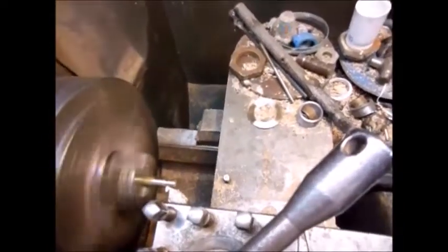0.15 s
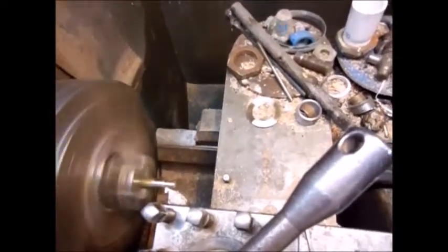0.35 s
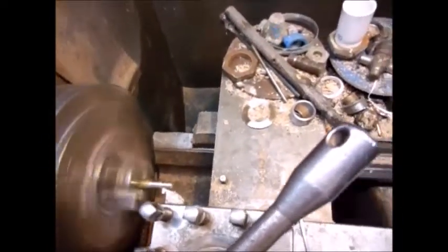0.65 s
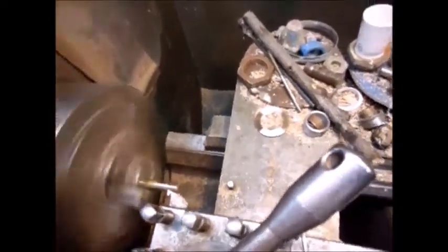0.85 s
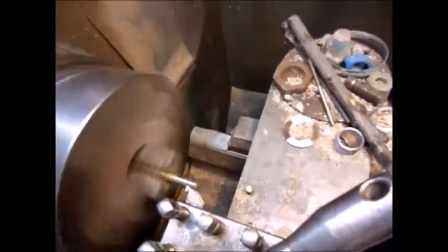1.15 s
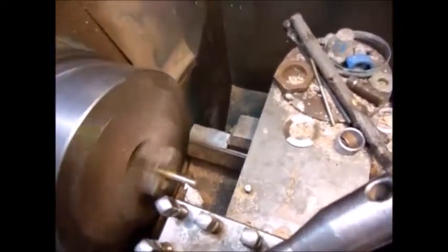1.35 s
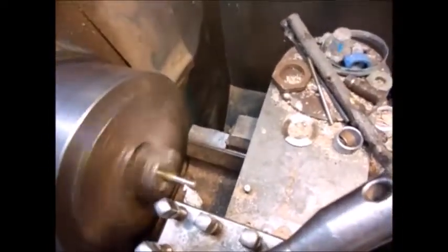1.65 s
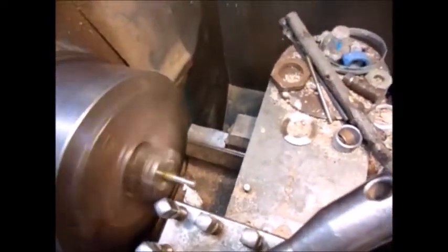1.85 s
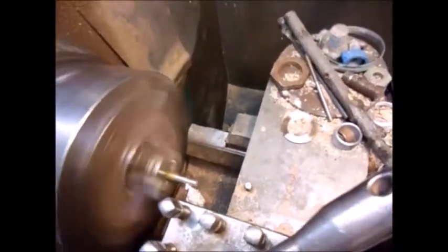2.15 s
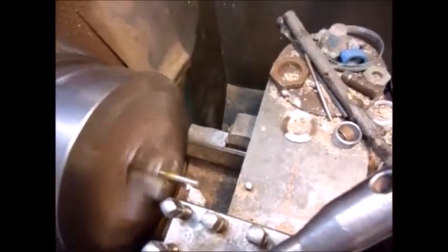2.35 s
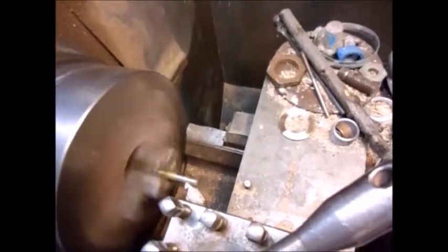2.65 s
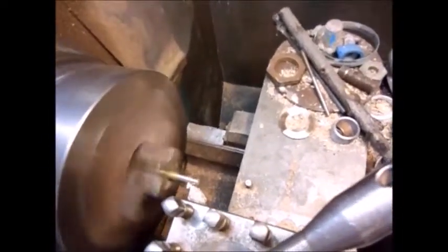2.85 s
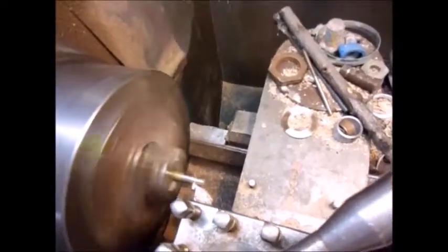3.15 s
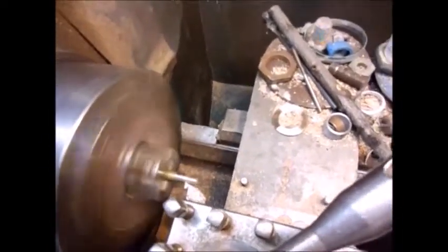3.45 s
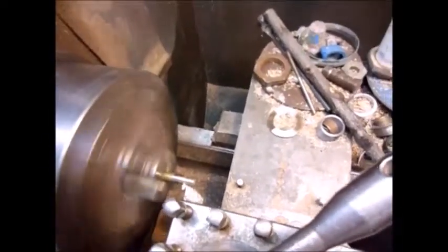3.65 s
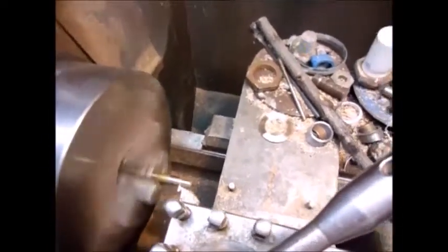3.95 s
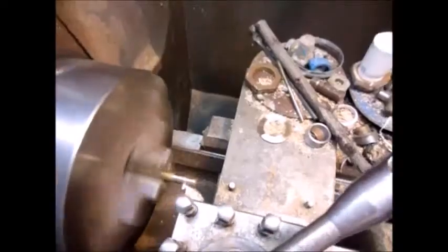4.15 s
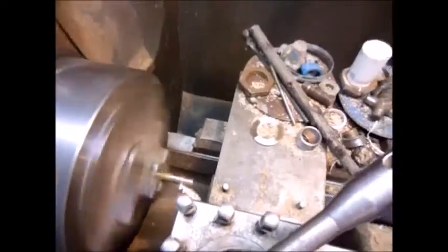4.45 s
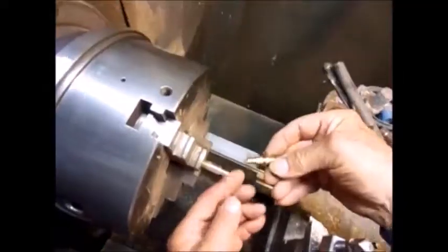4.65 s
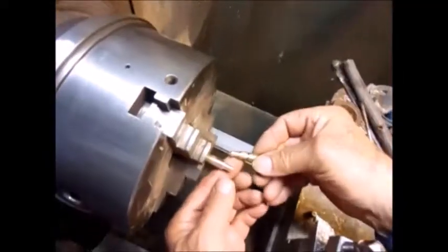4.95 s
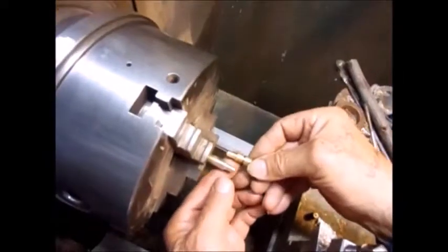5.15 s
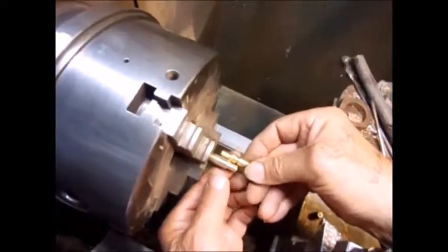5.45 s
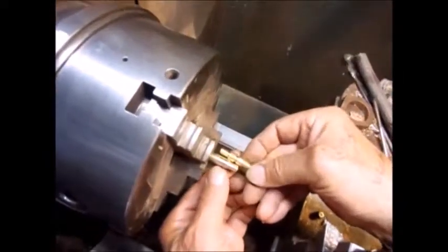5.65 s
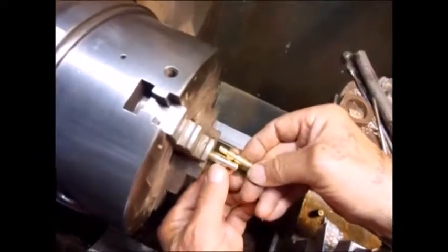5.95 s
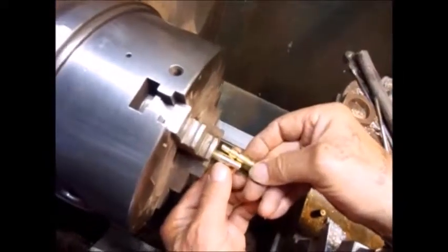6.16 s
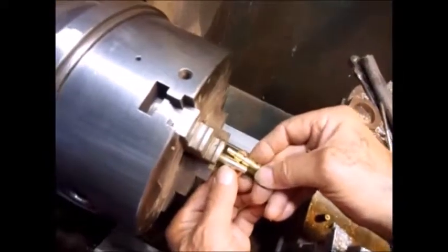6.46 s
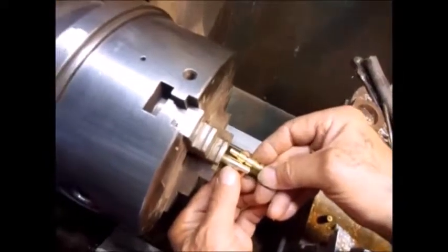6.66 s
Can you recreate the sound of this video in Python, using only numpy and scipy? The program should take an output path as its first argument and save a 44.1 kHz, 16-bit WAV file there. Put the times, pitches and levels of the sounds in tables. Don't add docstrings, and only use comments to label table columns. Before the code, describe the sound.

From 0 to 4.6 seconds a metal lathe runs loudly at close range in a small workshop. A steady mid-pitched gear whine flutters quickly and sways slowly over a rough, ringing cast-iron rumble that throbs about six times a second. Dry chip scuffs scatter through it, clearest near 0.8 and 3.75. The tool barely hisses at first, firming around 2 seconds. Short, bright bites squeak at 3.1 and 3.25, then longer stuttering squeals run from 3.35 to 3.6. The whine thins, and from 4.4 a coarse buzz grows as the cut deepens. At 4.6 it all stops dead. Far quieter room air settles, with tiny finger scratches and a knock until 4.75. A faint distant machine hum swells from 5.1 to 6. Sparse, delicate ticks follow at 5.5 and 5.7, then a faint ring at 6.5 and small knocks until 6.8.

```python
import sys
import numpy as np
from scipy import signal
from scipy.io import wavfile

SR = 44100
rng = np.random.default_rng(int(sys.argv[2]) if len(sys.argv) > 2 else 0)


def invert_db(x):
    u = np.asarray(x, float) / 20
    return 10 ** u


def dump(signal):
    limited = np.clip(np.atleast_2d(signal).T, -1, 1)
    pcm = np.round(limited * 32767).astype(np.int16)
    wavfile.write(sys.argv[1], SR, pcm)


N = 300762
T = np.arange(N) / SR
STOP_S = 4.6108
RUNNING_PART = slice(0, round(STOP_S * SR + 9))
QUIET_PART = slice(round(STOP_S * SR - SR / 10), N)


def rms_one(x):
    return x / np.sqrt(np.mean(x ** 2) + 1e-20)


def at_hz(points, hz):
    table_hz, value = np.transpose(points)
    return np.interp(np.log(hz), np.log(table_hz), value)


def drift(rate):
    r = np.exp(-80 * np.pi * rate / SR)
    white = rng.standard_normal(N // 40 + 2002)
    slow = signal.lfilter([1], [1, -2 * r, r * r], white)[2000:]
    return np.interp(np.arange(N) / 40, np.arange(len(slow)), rms_one(slow))


def resonance(x, hz, width):
    r = np.exp(-np.pi * width / SR)
    rung = signal.lfilter([1, 0, -1], [1, -2 * r * np.cos(2 * np.pi * hz / SR), r * r], x)
    return rung * np.sqrt(1 - r * r) / 2


def bandpass(x, low, high):
    return signal.sosfilt(signal.butter(2, [low, high], "band", fs=SR, output="sos"), x)


def pan(x, db):
    return x * invert_db(np.array([[db / 2], [-db / 2]]))


def pair(white, likeness, hz):
    alike = np.clip(at_hz(likeness, hz), -1, 1)
    shared = np.sqrt(1 + alike) * white[0]
    opposed = np.sqrt(1 - alike) * white[1] * [[1], [-1]]
    return shared + opposed


def banded_noise(spectrum, likeness, shared_db, own_db, part):
    together = drift(9.0)[part]
    edges = 28 * 2 ** np.arange(0, 9.6, .5)
    white = rng.standard_normal((2, 2, len(together)))
    total = 0
    for k, (low, high) in enumerate(zip(edges, edges[1:])):
        if high < spectrum[0][0] or low > spectrum[-1][0]:
            continue
        hz = np.sqrt(low * high)
        level_db = at_hz(spectrum, hz) + shared_db * together + own_db * drift(31.0)[part]
        total = total + invert_db(level_db) * pair(bandpass(white[k % 2], low, high), likeness, hz)
    out = np.zeros((2, N))
    out[:, part] = rms_one(total)
    return out


def puff(hz, width, t60, rise):
    t = np.arange(int(t60 * SR)) / SR
    noise = rng.standard_normal(2000 + len(t))
    rung = resonance(resonance(noise, hz, width), hz, width)[2000:]
    held = rung / (np.abs(signal.hilbert(rung)) + 1e-9) ** .75
    return rms_one(held) * np.minimum(t / rise, 1) * invert_db(-60 * t / t60)


def add(out, s, x):
    i = round(s * SR)
    out[:, i:i + x.shape[-1]] += x[..., :N - i]


MESH_HZ = 811.99
PINION_HZ, WHEEL_HZ = MESH_HZ / 41, MESH_HZ / 52
BELT_HZ, BELT_SWAY_S, BELT_LATE_S = 3.065, .000167, .1428
WHINE_DB, SAG_FROM_S, SAG_DB_PER_S = -23.5, 3.07, 2
SLACK_S, SLACK_WIDTH_S, SLACK_DB = 4.49, 0.027, -11
# pitch in Hz, peak level in dB, left-right difference in dB.
OTHER_TEETH = [(546.52, -46, 0), (1093.04, -46, 0), (1358.54, -38.5, 3), (1465.5, -43, 0), (1482.5, -41, 0),
               (1604.18, -36, -1), (1623.98, -34.5, -1), (1568.08, -44, 0), (1576.8, -45, 0),
               (1698.49, -40, 0), (1725.5, -43, 0), (2076.6, -45, 1), (2082.5, -45, 1), (2089.2, -46, 1)]
# shaft turns in Hz, swells per turn, swing in dB, first crest in seconds.
SWELL = [(WHEEL_HZ, 1, 4.16, .055), (WHEEL_HZ, 2, 2.12, .0093), (WHEEL_HZ, 3, 1.23, .0163),
         (PINION_HZ, 1, 1.94, .041), (BELT_HZ, 1, 2.29, .3208), (BELT_HZ, 3, 1.51, .0762)]
# shaft turns in Hz, swing in radians of the whine,
# earliest moment in seconds.
WOBBLE = [(WHEEL_HZ, .23, .0058), (PINION_HZ, .226, .0207), (BELT_HZ, .23, .2442)]


def gears():
    swayed = T + BELT_SWAY_S * np.cos(2 * np.pi * BELT_HZ * (T - BELT_LATE_S))
    swell_db = sum(db * np.cos(2 * np.pi * hz * k * (T - s)) for hz, k, db, s in SWELL)
    wobble = sum(rad * np.cos(2 * np.pi * hz * (T - s)) for hz, rad, s in WOBBLE)
    slack_db = SLACK_DB * np.exp(-((T - SLACK_S) / SLACK_WIDTH_S) ** 2)
    sag_db = -SAG_DB_PER_S * np.maximum(T - SAG_FROM_S, 0)
    lead = np.array([[.075], [-.075]])
    tone = np.cos(2 * np.pi * MESH_HZ * swayed + wobble + lead)
    out = pan(np.sqrt(2) * invert_db(WHINE_DB + slack_db + sag_db + swell_db) * tone, -.7)
    for hz, db, side in OTHER_TEETH:
        tone = np.sin(2 * np.pi * (hz * swayed + rng.random()))
        out += pan(invert_db(db + 2.74 * drift(5.9)) * tone, side)
    return out


SPINDLE_HZ, SPINDLE_LATE_S = 6.15, .146
RUMBLE_DB, THUMP_DB = -25.5, -11
THUMP_FADES_S, THUMP_FADE_DB = 4.44, -6
# frequency in Hz, likeness (1 is the same).
LIKE_RUN = [(60, 1), (530, 0.99), (1570, 0.82), (4680, 0.43), (8000, 0.18), (13900, 0.17)]
# frequency in Hz, level in dB per Hz.
RUMBLE = [(24, -84.5), (40, -56.5), (253, -27.5), (385, -19.5), (678, -28.5), (806, -4.5), (981, -24.5),
          (1650, -9.5), (1910, -22), (2100, -13.5), (3120, -20), (5230, -21), (14400, -93)]
# pitch in Hz, width in Hz, level in dB.
BODY = [(385.6, 11.5, -12.5), (472, 35, -12), (529, 57, -11), (587, 14, -39.5), (737, 22, -17.5),
        (817, 63, -3.5), (1084, 9.4, -22), (1226, 14, -10.5), (1369, 16, -10), (1432, 49, -13),
        (1580, 170, -5), (1706, 37, -3.5), (1825, 73, -12), (2092, 30, -6), (2180, 65, -12.5),
        (2414, 330, -7.5)]


def headstock():
    knocks = rng.standard_normal((2, N)) * invert_db(1.5 * drift(40.0))
    thump_db = THUMP_DB + THUMP_FADE_DB * np.clip((T - THUMP_FADES_S) / 0.044, 0, 1)
    throb_db = 3.2 * np.cos(2 * np.pi * SPINDLE_HZ * (T - SPINDLE_LATE_S))
    thumps = knocks * invert_db(throb_db + thump_db + 10)
    modes = 0
    for k, (hz, width, db) in enumerate(BODY):
        shaken = thumps if hz < 700 or 1150 < hz < 1300 else knocks
        sign = (-1) ** k
        modes = modes + sign * invert_db(db) * pair(resonance(shaken, hz, width), LIKE_RUN, hz)
    broad = banded_noise(RUMBLE, LIKE_RUN, shared_db=0.83, own_db=1.0, part=RUNNING_PART)
    return invert_db(RUMBLE_DB - 2.5) * (broad + pan(modes, 1.2))


# start in seconds, peak level in dB.
SCUFFS = [(0.051, -20.5), (.772, -17.5), (0.98, -21.5), (1.107, -27), (1.33, -22), (1.931, -30),
          (2.068, -24), (2.43, -24), (3.749, -17.5), (3.835, -23), (4.212, -21), (4.455, -22), (4.489, -30),
          (4.54, -20), (4.581, -27)]


def chip_scuffs():
    out = np.zeros((2, N))
    for s, db in SCUFFS:
        add(out, s, invert_db(db - 7.5) * puff(3300, 4000, t60=0.089, rise=0.0046))
    return out


HISS_DB, HISS_FOLLOWS, LIGHT_DB = -56, 0.4, -62.5
SQUEAK_T60_S = 0.052
STUTTER_FROM_S, STUTTER_GAP_S, STUTTER_DB = 3.362, .0065, -19
STUTTER_LOW_HZ, STUTTER_HIGH_HZ = 4280, 5900
# time in seconds, level in dB.
PRESSURE = [
    (0, -65),
    (1.6, -58),
    (1.95, -54),
    (2.3, -56),
    (3.1, -48),
    (3.35, -42.5),
    (3.75, -42),
    (4.2, -48.5),
    (4.3, -35.5),
    (4.61, -41.5),
]
# start in seconds, end in seconds, level in dB.
BITES = [
    (3.119, 3.15, -33.5),
    (3.239, 3.272, -30.5),
    (3.36, 3.45, -31),
    (3.455, 3.556, -33),
]
# start in seconds, peak level in dB, pitch in Hz.
CHATTER = [(3.12, -14.5, 8150), (3.14, -14.5, 7940), (3.24, -12.5, 8000), (3.242, -16.5, 5050),
           (3.253, -12, 8050), (3.361, -15, 5050), (3.363, -18, 8600), (3.368, -19, 7800),
           (3.37, -16.5, 6360), (3.402, -24, 5200), (3.418, -18, 4900), (3.431, -18.5, 5080),
           (3.447, -12.5, 5050), (3.476, -20, 4330), (3.508, -17, 3750), (3.535, -29.5, 4500),
           (3.49, -13, 8060), (3.493, -22, 5340), (3.505, -12, 8050), (3.51, -24, 5300), (3.544, -13, 7900),
           (3.545, -23, 5300)]
# pitch in Hz, width in Hz, level in dB.
TOOL = [(4060, 93, -13), (5050, 110, -13), (5300, 110, -9), (6460, 200, -19), (7530, 100, 0),
        (8050, 68, -6), (11100, 180, -5.5), (13100, 400, 0)]
# frequency in Hz, level in dB per Hz.
CHIPS = [(1760, -29.5), (3000, -7.5), (4650, -10.5), (5100, -2.5), (7030, -12.5), (8060, -14),
         (9880, -26.5), (13400, -12), (14400, -21.5)]


def cutting():
    ring_db = np.interp(T, *np.transpose(PRESSURE))
    hiss_db = HISS_DB + HISS_FOLLOWS * (ring_db - LIGHT_DB)
    bite = 0
    for start, end, db in BITES:
        bite = bite + invert_db(db) * np.clip((T - start) / 0.0037, 0, 1) * np.clip((end - T) / 0.0054 + 1, 0, 1)
    tears = (rng.random((2, N)) < 12000 / SR) * rng.standard_normal((2, N))
    rings = 0
    for hz, width, db in TOOL:
        rings = rings + invert_db(db + 2.1 * drift(40.0)) * pair(resonance(tears, hz, width * 2), LIKE_RUN, hz)
    rings = rms_one(rings)
    rod = resonance(resonance(tears, 8020, 400), 8020, 400)
    skim = rms_one(invert_db(4.0 * drift(32.0)) * pair(rod, LIKE_RUN, 3700))
    hiss = banded_noise(CHIPS, LIKE_RUN, shared_db=1.3, own_db=.8, part=RUNNING_PART)
    out = bite * (invert_db(-0.5) * rings + invert_db(-4.0) * hiss)
    out += invert_db(ring_db - 1.0) * skim
    out += invert_db(hiss_db + 5) * (hiss + invert_db(-9) * rings)
    squeaks = list(CHATTER)
    for k, (late, weak, pitch) in enumerate(rng.random((30, 3))):
        s = STUTTER_FROM_S + STUTTER_GAP_S * (k + late)
        hz = STUTTER_LOW_HZ * (STUTTER_HIGH_HZ / STUTTER_LOW_HZ) ** pitch
        squeaks.append((s, STUTTER_DB - 8.0 * weak, hz))
    for s, db, hz in squeaks:
        add(out, s, invert_db(db - 7.0) * puff(hz, 140, SQUEAK_T60_S, rise=0.0046))
    return pan(out, 2.5)


STRAIN_FROM_S, STRAIN_RISE_S, STRAIN_DB = 4.38, 0.38, -25
STRAIN_HZ, STRAIN_WIDTH_HZ = 2250, 380


def loaded_body():
    grown = np.clip((T - STRAIN_FROM_S) / STRAIN_RISE_S, 0, 1)
    shake = rng.standard_normal((2, N)) * invert_db(3.6 * drift(30.0))
    buzz = pair(resonance(shake, STRAIN_HZ, STRAIN_WIDTH_HZ), LIKE_RUN, STRAIN_HZ)
    return grown * invert_db(STRAIN_DB) * rms_one(buzz)


AIR_DB, SETTLE_DB, SETTLE_S = -57.5, 6, 0.42
HUM_FROM_S, HUM_RISE_S, HUM_LOW_DB, HUM_DB, AIR_FOLLOWS = 5.14, 0.85, -78, -58, 0.11
# frequency in Hz, level in dB per Hz.
AIR = [(18, -47), (30, -32), (70, -5), (141, -12.5), (219, -5.5), (323, -3), (349, -7), (648, -3),
       (1730, -12), (2020, -16.5), (4610, -24.5), (13300, -38), (14400, -41.5)]
# frequency in Hz, likeness (1 is the same).
LIKE_SHOP = [(60, 0.97), (180, 0.89), (530, 0.89), (1570, 0.56), (4680, 0.054), (13900, 0.02)]
# pitch in Hz, rms level in dB.
LAMP = [(11310, -99), (12328, -95), (13194, -83)]


def shop_air():
    swell_db = (HUM_DB - HUM_LOW_DB) * np.clip((T - HUM_FROM_S) / HUM_RISE_S, 0, 1)
    air_db = AIR_DB + AIR_FOLLOWS * swell_db + SETTLE_DB * np.exp(-np.abs(T - STOP_S) / SETTLE_S)
    hum_db = HUM_LOW_DB + swell_db
    out = invert_db(air_db) * banded_noise(AIR, LIKE_SHOP, shared_db=1.5, own_db=0.2, part=QUIET_PART)
    out += invert_db(hum_db - 2.5) * rms_one(resonance(rng.standard_normal(N), 217, 43))
    out += invert_db(hum_db - 6.0 + 1.9 * drift(25.0)) * rms_one(resonance(rng.standard_normal(N), 1050, 160))
    for hz, db in LAMP:
        out += np.sqrt(2) * invert_db(db) * np.sin(2 * np.pi * hz * T)
    add(out, STOP_S, invert_db(-57) * puff(900, 680, t60=0.76, rise=.001))
    return out


SLIP_WIDTH, TICK_WIDTH, RING_WIDTH = 1.3, 0.24, .014
# start in seconds, peak level in dB, pitch in Hz,
# time to fall 60 dB in seconds, left-right difference in dB.
SLIPS = [
    (4.634, -46, 4500, 0.033, 0),
    (4.691, -48, 2600, .06, -4),
    (4.7048, -39.5, 9050, 0.029, 8),
    (4.707, -38.5, 3760, 0.035, 4),
]
# start in seconds, peak level in dB, pitch in Hz,
# time to fall 60 dB in seconds, left-right difference in dB.
TICKS = [
    (4.657, -46, 1150, 0.044, 0),
    (4.832, -57, 2400, 0.13, -2),
    (4.941, -57, 3350, 0.031, 2),
    (5.493, -56, 1500, .06, 0.5),
    (5.685, -55, 1750, 0.12, 2),
    (6.483, -58, 2280, 0.035, 5),
    (6.547, -43, 1000, 0.029, -1),
    (6.716, -47, 4500, 0.021, 6),
    (6.737, -62, 4600, 0.036, 0),
    (6.799, -44.5, 1730, 0.027, 0),
]
# start in seconds, peak level in dB, pitch in Hz,
# time to fall 60 dB in seconds, left-right difference in dB.
RINGS = [
    (5.493, -59, 11100, 0.041, 12),
    (5.493, -66, 8100, 0.064, 0),
    (6.497, -67, 3360, 0.6, 0),
]


def fingers():
    out = np.zeros((2, N))
    for touches, share in ((SLIPS, SLIP_WIDTH), (TICKS, TICK_WIDTH), (RINGS, RING_WIDTH)):
        for s, db, hz, t60, side in touches:
            add(out, s, pan(invert_db(db) * puff(hz, share * hz, t60, rise=.001), side))
    return out


def scene():
    lathe = gears() + headstock() + chip_scuffs() + cutting() + loaded_body()
    lathe[0] = np.roll(lathe[0], -1)
    floor = invert_db(-68.5) * rms_one(bandpass(rng.standard_normal(N), 35, 90))
    shop = pan(shop_air() + fingers(), 0.57)
    running = np.clip((STOP_S - T) / .0006, 0, 1)
    return running * (lathe + floor) + (1 - running) * shop


def low_pass(x):
    return signal.sosfilt(signal.butter(12, 14500, fs=SR, output="sos"), x)


def record(dry):
    top_cut = signal.cheby2(20, 60, 14500, fs=SR, output="sos")
    mix = signal.sosfilt(top_cut, dry)
    return low_pass(mix)


dry = scene()
out = record(dry)
dump(out)
```